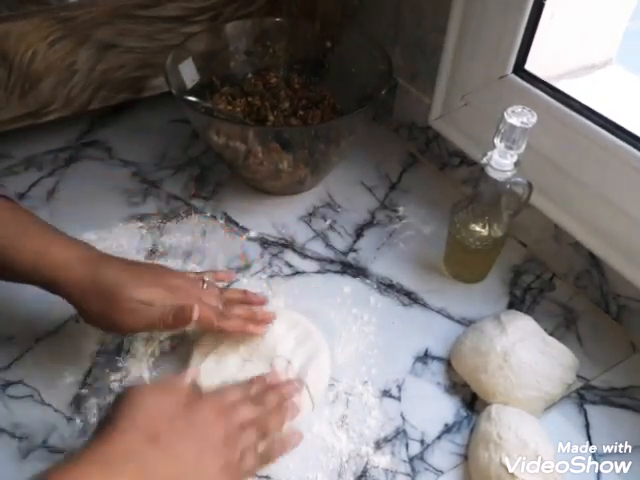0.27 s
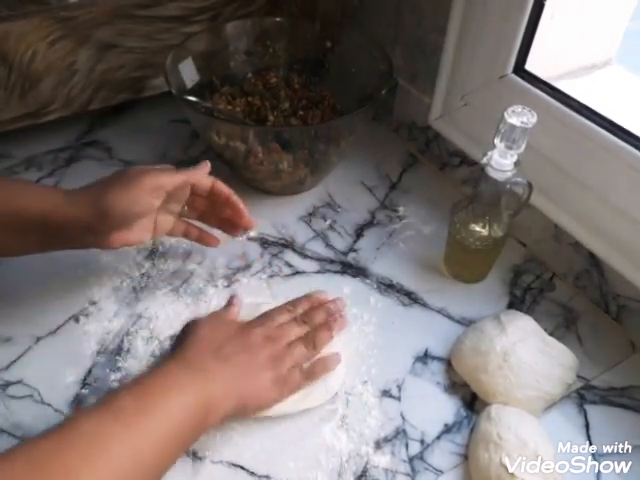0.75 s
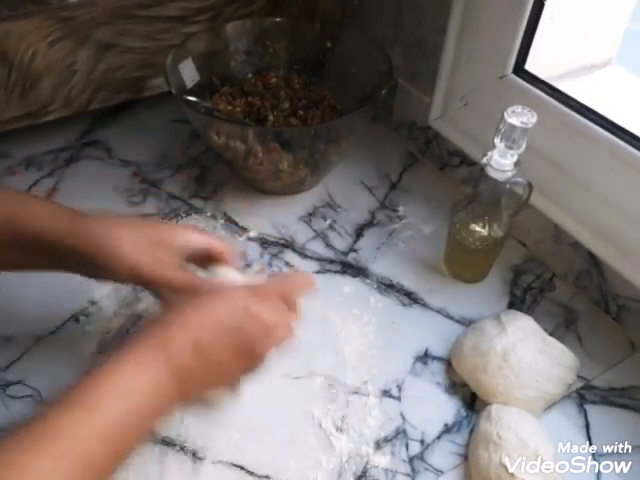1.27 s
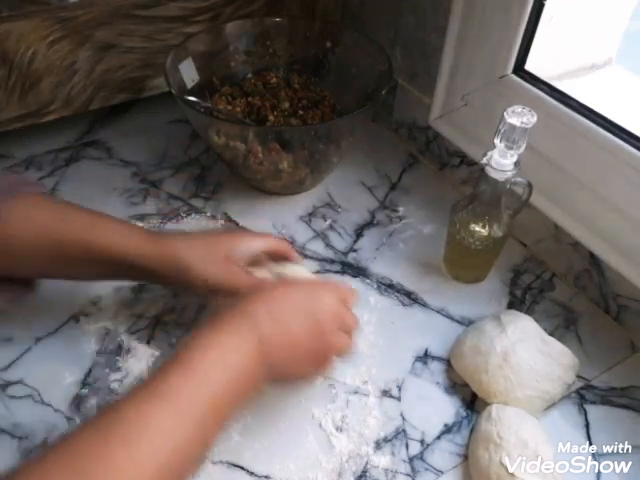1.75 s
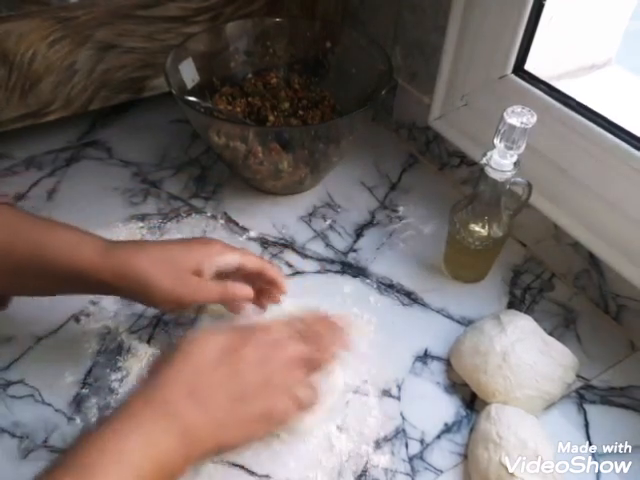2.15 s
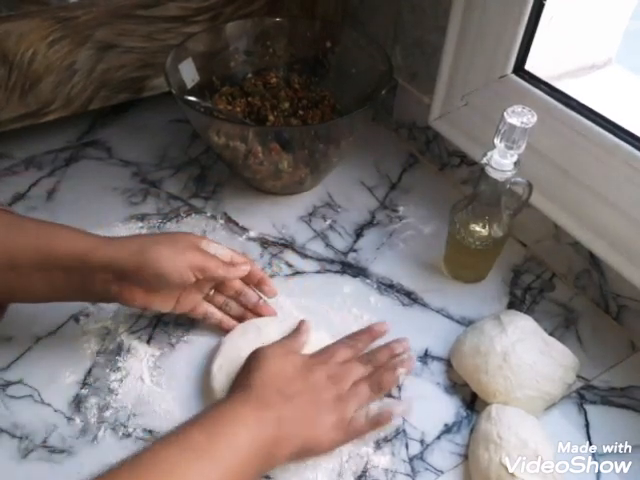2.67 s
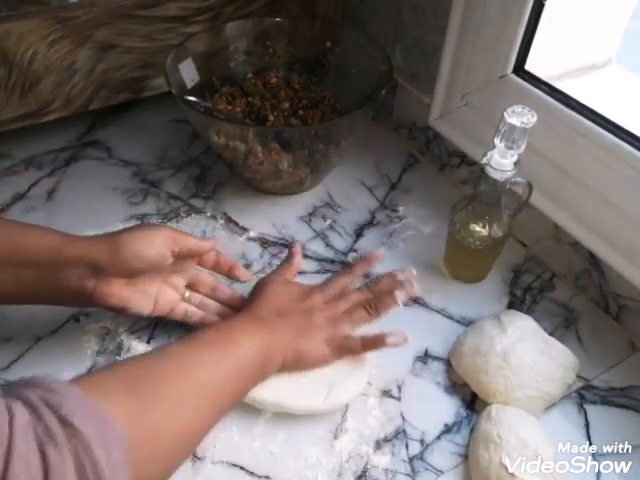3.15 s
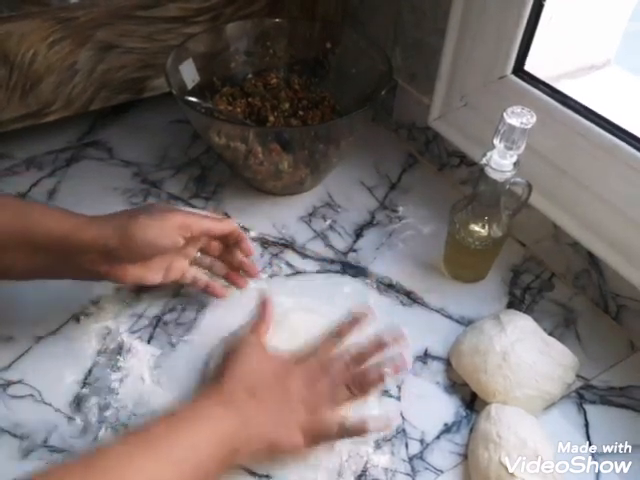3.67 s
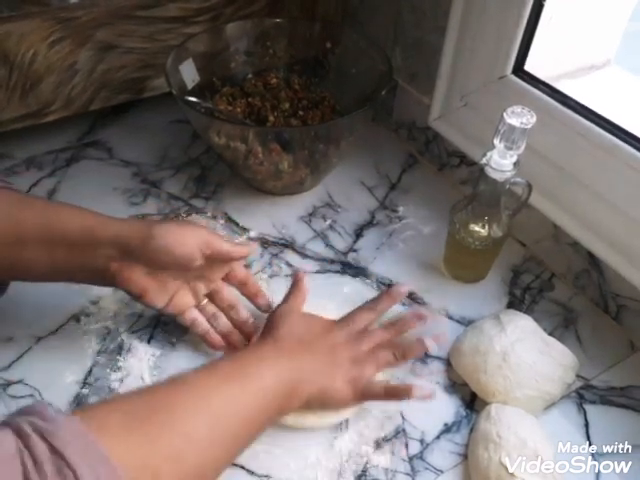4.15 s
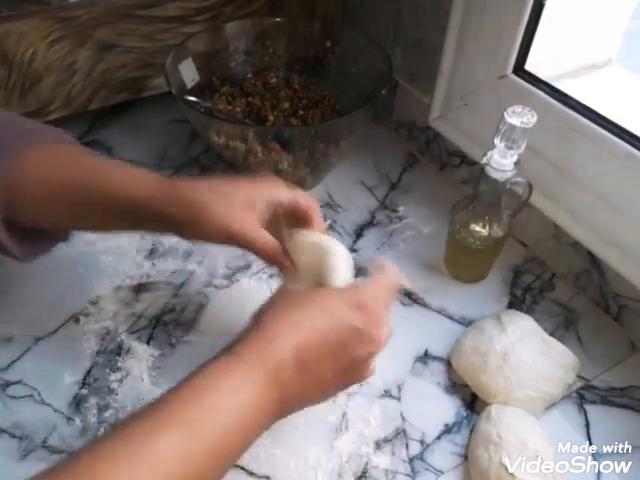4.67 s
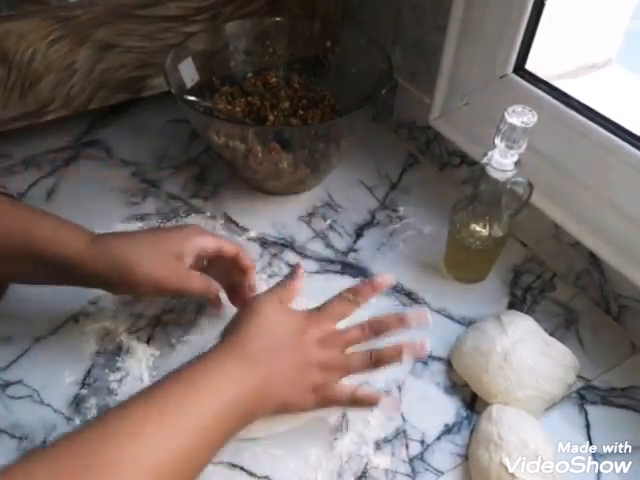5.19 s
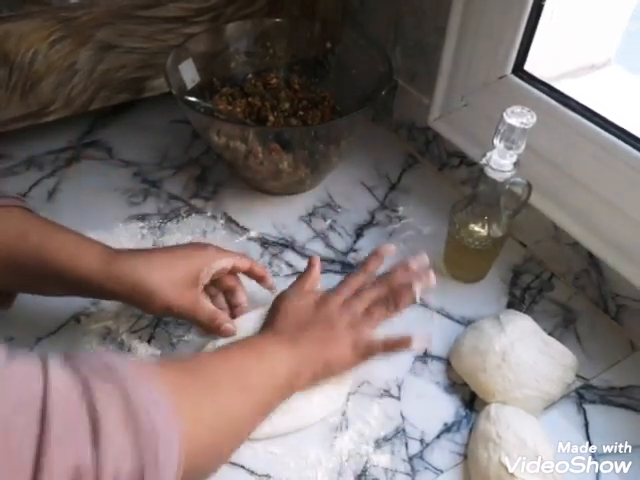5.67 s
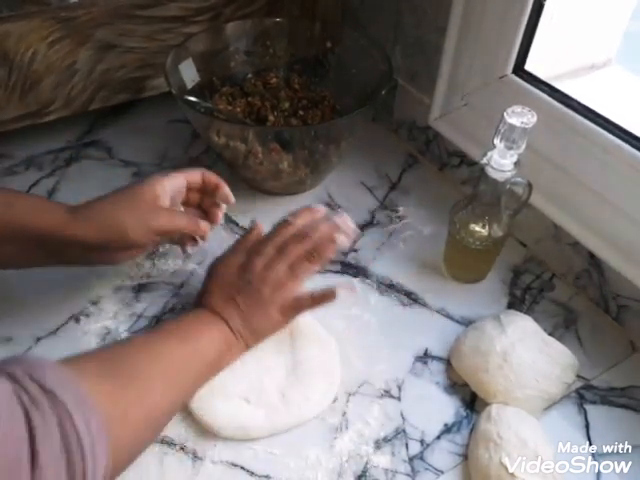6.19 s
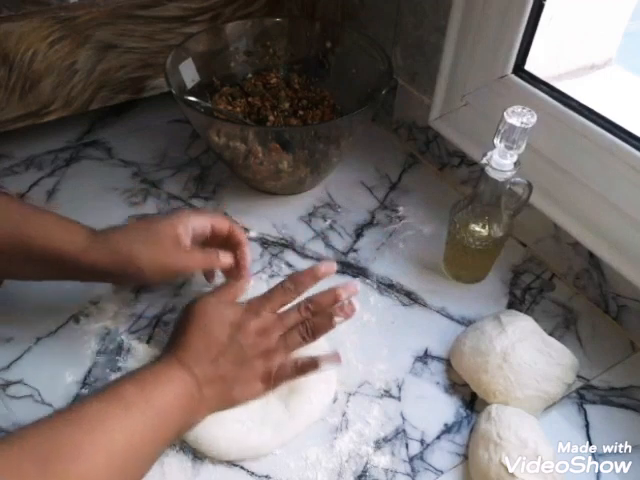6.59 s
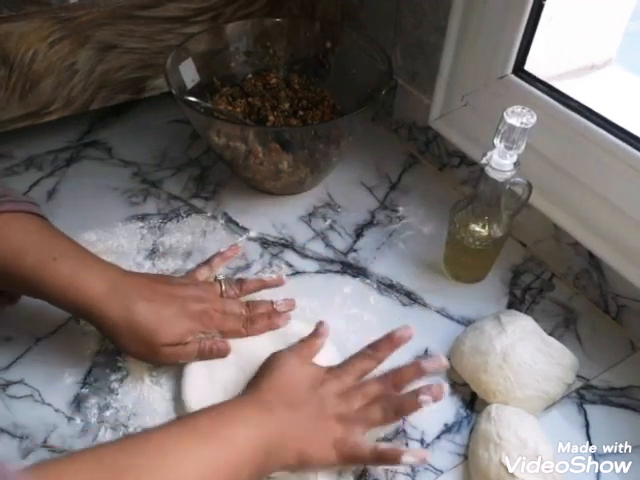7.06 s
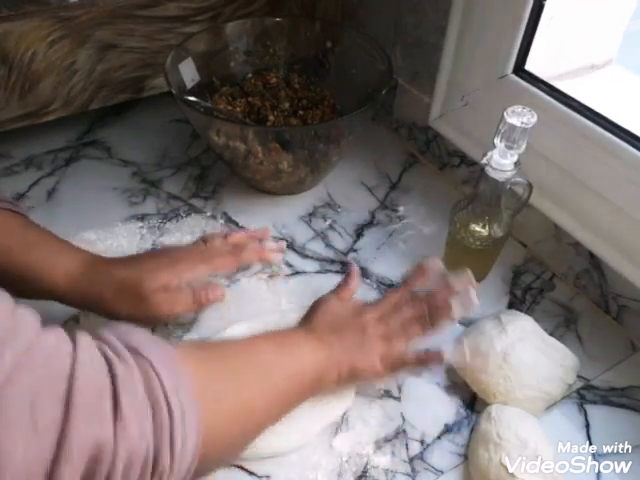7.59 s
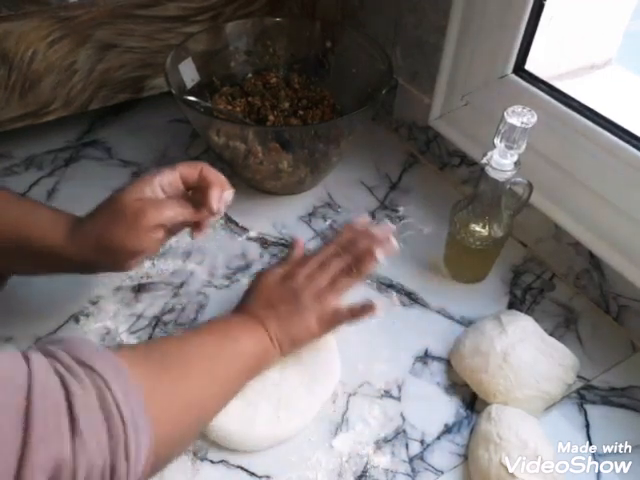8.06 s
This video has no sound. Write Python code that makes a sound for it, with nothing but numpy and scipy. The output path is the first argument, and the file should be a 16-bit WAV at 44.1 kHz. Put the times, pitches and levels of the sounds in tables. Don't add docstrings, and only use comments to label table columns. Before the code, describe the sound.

Close in a hard, echoing kitchen, bare hands work soft dough on a floured stone counter. Early pats build to a firm slap, then dry skin rubs through flour as the dough is turned. More pats follow, with two loud smacks standing well above the rest, and the end fades into faint touches and light brushing over a low room rumble.

```python
import sys
import numpy as np
from scipy import signal
from scipy.fft import rfft, irfft
from scipy.io import wavfile
from scipy.ndimage import uniform_filter1d

SR = 44100
rng = np.random.default_rng(int(sys.argv[2]) if len(sys.argv) > 2 else 0)


def dump(signal):
    limited = np.clip(np.atleast_2d(signal).T, -1, 1)
    pcm = np.round(limited * 32767).astype(np.int16)
    wavfile.write(sys.argv[1], SR, pcm)


def level_to_linear(level):
    exponent = np.asarray(level, float) / 20
    return 10 ** exponent


N = 367353

# [dB, flour puff against palm]
SLAPS = [(0.072, -39, 805, 1.3, -14), (0.46, -40.5, 382, 2.1, -11), (0.647, -30.5, 620, 0.96, -15),
         (0.845, -19.5, 1200, 4.5, -16), (2.15, -52.5, 382, 0.79, -8.5), (2.297, -32, 670, 0.74, -29),
         (2.536, -26, 714, 2.1, -36), (2.75, -22, 930, 1.7, -32), (2.96, -29, 643, 1.17, -19),
         (3.168, -41, 398, 1.9, -14.5), (3.384, -30, 537, 0.4, -16.5), (3.498, -50, 505, 0.14, -13),
         (3.585, -6.5, 524, 0.33, -14.5), (3.979, -19, 536, 0.85, -20.5), (4.201, -38, 636, 0.2, -9.5),
         (4.999, -22, 600, 1.5, -31.5), (5.309, -24.5, 776, 0.32, -18.5), (5.62, -29.5, 456, 0.94, -24.5),
         (5.8983, -7.5, 676, 0.69, -17.5), (6.396, -42, 710, 0.41, -9.5), (6.866, -47.5, 809, 0.79, 1),
         (7.075, -50.5, 496, 1.4, -6), (7.301, -47.5, 908, 0.48, -12), (8.008, -49, 772, 0.47, -23)]


def at_hz(points, hz):
    points = np.array(points)
    return np.interp(np.log(hz), np.log(points[:, 0]), points[:, 1])


def rms_one(x):
    return x / np.sqrt(np.mean(x ** 2) + 1e-20)


def drift(rate_hz):
    steps = rng.standard_normal(int(N / SR * rate_hz) + 3)
    return np.interp(np.arange(N) / SR * rate_hz, np.arange(len(steps)), steps)


def bands(count, low_hz):
    white = rng.standard_normal((2, count))
    edges = low_hz * 2 ** np.arange(0, 12, 0.5)
    edges = edges[edges < 0.45 * SR]
    for k, (low, high) in enumerate(zip(edges, edges[1:])):
        band = signal.butter(2, [low, high], "band", fs=SR, output="sos")
        yield np.sqrt(low * high), signal.sosfilt(band, white[k % 2])


def resonance(x, hz, width_hz):
    r = np.exp(-np.pi * width_hz / SR)
    y = signal.lfilter([1, 0, -1], [1, -2 * r * np.cos(2 * np.pi * hz / SR), r * r], x)
    return y / np.abs(y).max()


def add(out, s, x):
    i = round(s * SR)
    out[i:i + len(x)] += x[:N - i]


def rumble():
    # band_hz [Hz], level_db [dB per Hz]
    house = [(15, -43), (25, 3), (120, 6.5), (157, -1), (242, -11.5), (560, -6.5), (1160, -19.5),
             (1370, -11.5), (3160, -31), (4870, -23.5), (12500, -24.5), (14400, -28.5), (16000, -55.5)]
    noise_sum = 0
    for hz, noise in bands(N, low_hz=24.9):
        noise_sum = noise_sum + noise * level_to_linear(at_hz(house, hz) + 2.5 * drift(5))
    return level_to_linear(-68) * rms_one(noise_sum)


def swells(rows, fade_db):
    t = np.arange(0, N, 32)[:, None] / SR
    s, db, rise_s, fall_s = np.transpose(rows)
    away = np.maximum((s - t) / np.maximum(rise_s, 0.005), (t - s) / np.maximum(fall_s, 0.005))
    power = (level_to_linear(db - fade_db * away) ** 2).sum(axis=1)
    return np.interp(np.arange(N) / SR, t[:, 0], power)


def rub():
    # fastest_s [s], hiss_db [dB], speeding_up_s [s], slowing_down_s [s]
    strokes = [(.05, -51.5, 0.17, 0.16), (.28, -58.5, 0.1, 0.091), (.79, -58.5, 0.6, 0.39),
               (1.15, -50, 0.039, 0.24), (1.33, -50.5, 0.085, 0.067), (1.53, -69, 0.0092, 0.6),
               (1.7, -44, 0.055, 0.35), (1.83, -38.5, 0.43, 0.21), (1.99, -48, 0.23, 0.054),
               (3.125, -43, .05, 0.044), (3.2, -59, .4, 0.54), (3.325, -53.5, .08, .04),
               (4.22, -47, 0.12, 0.014), (4.71, -49, 0.32, 0.15), (5.8, -41.5, 0.075, 0.032),
               (5.97, -55, 0.031, 0.49), (6.17, -49, 0.071, 0.11), (6.295, -42, 0.026, 0.045),
               (6.4, -44, .03, 0.058), (6.63, -48, 0.027, 0.057), (6.87, -48, .06, .11),
               (7.1, -57.5, 0.48, .11), (7.24, -47.5, 0.18, 0.027), (7.38, -61, .2, 0.18),
               (7.47, -44.5, 0.17, 0.022), (7.7, -48.5, .06, 0.14), (7.66, -55, 0.42, 0.097),
               (7.8, -58, .1, 1.3), (8.195, -46.5, 0.029, .12)]
    brushes = [(1.23, -50.5, .06, 0.17), (1.455, -62, 0.018, 0.0073), (2.09, -60, 0.027, 0.071),
               (2.556, -36.5, 0.011, 0.019), (2.46, -56, 0.036, .03), (2.68, -58, 0.026, .03),
               (3.79, -52.5, 0.052, 0.1), (4.335, -56.5, 0.03, 0.058), (4.6, -55.5, .08, 0.053),
               (6.06, -51, 0.059, 0.046), (6.535, -52.5, .04, 0.056), (6.78, -56.5, 0.051, 0.056),
               (7.02, -53, 0.058, .05), (8.27, -51, 0.039, .06)]
    # band_hz [Hz], level_db [dB per Hz]
    flour = [(290, -78), (500, -43.5), (773, -11), (1670, -3.5), (2160, -6), (4280, -4), (5800, 0.5),
             (10400, -6.5), (13300, -3), (16000, -8)]
    fade_db, resting_db = 28, -70
    stroke_dullness, spray_dullness, brush_dullness = 0.27, 4, -4.5

    spray_rise_s, spray_fall_s = 0.004, fade_db / 109
    sprays = []
    for s, db, *_ in SLAPS:
        spray_db = -53 + 0.42 * (db + 31)
        sprays.append((s + spray_rise_s, spray_db, spray_rise_s, spray_fall_s))

    sliding = swells(strokes, fade_db) + level_to_linear(resting_db) ** 2
    spray = swells(sprays, fade_db)
    brush = swells(brushes, fade_db)
    power = sliding + spray + brush
    dullness = (stroke_dullness * sliding + spray_dullness * spray + brush_dullness * brush) / power

    grit = level_to_linear(1.6 * drift(70) + 1.3 * drift(400))
    hiss = 0
    for hz, noise in bands(N, low_hz=582.0):
        tilt_db = np.clip(dullness, -8, 6) * np.log2(8000 / hz)
        hiss = hiss + noise * level_to_linear(at_hz(flour, hz) + tilt_db + 2 * drift(25))
    return np.sqrt(power) * grit * hiss


def escaping_air(closing_ms, noise):
    t = np.arange(len(noise)) / SR / (closing_ms / 1000)
    swell = t ** 2 * np.exp(-t)
    burst = noise * swell
    for _ in range(3):
        spectrum = rfft(burst)
        burst = irfft(spectrum / (np.abs(spectrum) + 1e-12)) * np.minimum(3 * swell, 1)
    return np.pad(burst, (0, 1500))


def slaps():
    # level_db [dB peak], pocket_hz [Hz], relative_width [1]
    fingers = [(-45, 3900, 0.23), (-44, 2050, 1.14), (-26, 2670, 0.77), (-27, 2340, 0.15), (-54, 4540, 0.6),
               (-24, 5120, 0.75), (-28.5, 5000, 0.92), (-16, 2760, 1.0), (-30.5, 3150, 0.6),
               (-32.5, 1700, 0.91), (-43.5, 5400, 0.12), (-63, 3940, 0.3), (-7.5, 2420, 1.4),
               (-28.5, 3400, 1), (-48.5, 2535, 0.36), (-20.5, 1390, 1.7), (-20.5, 2190, 0.42),
               (-37, 2200, 0.19), (-24, 3200, 1.1), (-45.5, 4600, 0.44), (-61, 3770, 1.6), (-49, 3920, 0.3),
               (-43, 2700, 1.2), (-61.5, 5664, 0.3)]
    # start_s [s], level_db [dB peak], pocket_hz [Hz], relative_width [1]
    fingertips = [(.259, -46.5, 2020, 1.15), (0.476, -34.5, 1730, 1.85), (.836, -32.5, 2600, 2.7),
                  (1.521, -57.5, 515, 1.4), (2.551, -52, 3470, 2.9), (3.375, -51, 700, 2.1),
                  (4.989, -41.5, 1275, 1.4), (5.631, -46, 700, 0.74), (7.225, -42.5, 4610, 0.61),
                  (7.455, -51, 4590, .8), (7.519, -49, 2404, 1.5), (7.654, -59, 3535, 1.3),
                  (7.754, -52.5, 1577, .57), (7.935, -52.5, 4200, 1), (8.19, -47, 3060, 4.4),
                  (7.96, -58.5, 3830, 0.43), (8.212, -44, 5020, 0.8)]
    out = np.zeros(N)
    noise = rng.standard_normal((len(SLAPS), 1024))
    palm_top = signal.butter(1, 3500, fs=SR, output="sos")
    puff_band = signal.butter(2, [4200, 11000], "band", fs=SR, output="sos")

    for slap, landing, rough in zip(SLAPS, fingers, noise):
        s, db, hz, width, puff_db = slap
        finger_db, finger_hz, finger_width = landing
        closing_ms = 0.7414 - 0.09 * db
        air = escaping_air(np.clip(closing_ms, 0.4, 3.5) * 0.83, rough)
        lead_s = 0.0006 * closing_ms

        palm = signal.sosfilt(palm_top, resonance(air, hz, np.clip(width, 0.1, 1.5) * hz))
        puff = signal.sosfilt(puff_band, air)
        puff = level_to_linear(puff_db + 3) * puff / np.abs(puff).max()
        width_hz = np.clip(finger_width, 0.15, 2) * finger_hz
        finger = -resonance(resonance(air, finger_hz, width_hz), finger_hz, width_hz)
        add(out, s - lead_s, level_to_linear(db - 0.87) * (palm + puff) + level_to_linear(finger_db - 4.0) * finger)

    for (s, db, hz, width), rough in zip(fingertips, noise[:, ::-1]):
        width_hz = np.clip(width, 0.2, 2) * hz
        air = escaping_air(1.5, rough)
        add(out, s - 0.005, level_to_linear(db) * resonance(resonance(air, hz, width_hz), hz, width_hz))
    return out


def thuds():
    # start_s [s], level_db [dB peak], thud_hz [Hz]
    landings = [(0.075, -55.5, 144), (0.25, -56, 133), (0.472, -41, 146), (0.641, -35, 141),
                (0.841, -43, 142), (1.13, -48.5, 173), (2.147, -55.5, 130), (2.292, -44, 96),
                (2.544, -43, 159), (2.75, -45, 156), (2.96, -42, 120), (3.064, -57.5, 124),
                (3.167, -54.5, 133), (3.388, -45, 151.6), (3.588, -30, 152), (3.814, -43, 174),
                (3.974, -37, 180), (4.202, -50, 165), (4.997, -45, 96.5), (5.306, -40.5, 138),
                (5.622, -39, 129), (5.897, -33, 179), (6.261, -67, 162), (7.295, -64, 135)]
    out, t = np.zeros(N), np.arange(6000) / SR
    push = t * np.exp(-t / 0.0014)
    for s, db, hz in landings:
        add(out, s, level_to_linear(db + 0.5) * resonance(resonance(push, hz, 70), hz, 110))
    return out


def kitchen(x, tail_db):
    # band_hz [Hz], t60_s [s]
    decay = [(80, 2.3), (210, 0.7), (560, 1.36), (1470, 1.17), (3880, 1.32), (10200, 0.062)]
    # band_hz [Hz], level_db [dB]
    colour = [(80, -9), (170, 4), (260, 3.5), (560, -3.5), (1500, -5), (4000, -4.5), (10000, -1.5)]
    # delay_s [s], level_db [dB]
    echoes = [
        (.0042, -15),
        (0.014, -16),
        (0.024, -17.5),
        (.034, -22),
        (0.06, -29.5),
    ]
    t = np.arange(2 * SR) / SR
    tail = 0
    for hz, noise in bands(len(t), low_hz=50):
        tail = tail + noise * level_to_linear(at_hz(colour, hz) - 60 * t / at_hz(decay, hz))
    answer = level_to_linear(tail_db) * tail * (1 - np.exp(-t / 0.0027))
    answer[0] = 1
    for s, db in echoes:
        answer[round(s * SR)] += level_to_linear(db)
    return signal.fftconvolve(x, answer)[:N]


def grainy_sides(mono):
    # band_hz [Hz], level_db [dB per Hz]
    grain_colour = [(24, -33), (40, -2.5), (140, -1.5), (354, -2), (810, -2.5), (2980, -2.5), (4460, 0.5),
                    (14500, -3.5), (16000, -13.5)]
    hz, _, cells = signal.stft(mono, SR, nperseg=1024)
    level = np.abs(uniform_filter1d(np.abs(cells) ** 2, size=12, axis=0)) + 1e-30
    total = level.sum(axis=0)

    floor_db = -59.0 + 16 * np.log2((hz[:, None] + 1) / 10000)
    audible = level / (total * level_to_linear(2 * floor_db))
    mid = signal.istft(cells * audible ** 2 / (1 + audible ** 2), SR)[1][:N]

    noise = rng.standard_normal(cells.shape) + 1j * rng.standard_normal(cells.shape)
    grain = level_to_linear(at_hz(grain_colour, hz + 1) - 100.5)[:, None] * (total * 1e6) ** 0.12
    smooth = uniform_filter1d(uniform_filter1d(noise.real, size=16, axis=0), size=3, axis=1)
    patches = level_to_linear(7 * rms_one(smooth))
    masked = np.sqrt(level) * patches / (grain * level_to_linear(41.5))
    sudden = total > level_to_linear(2 * 9) * np.roll(total, 2)
    attack = level_to_linear(-34.5) * sudden * np.abs(cells) * noise
    side = signal.istft(grain * noise / (1 + masked ** 4) + attack, SR)[1][:N]
    return np.array([mid + side, mid - side])


def scene():
    hits, hiss = slaps() + thuds(), rub()
    room = kitchen(hits + level_to_linear(-7.5) * hiss, tail_db=-37)
    mono = room + level_to_linear(-14.5) * hiss + rumble()
    return np.array([mono, mono])


def band_limit(x):
    return signal.sosfilt(signal.butter(12, 16460, fs=SR, output="sos"), x)


def record(dry):
    low_cut = signal.butter(2, 74, "high", fs=SR, output="sos")
    top_cut = signal.cheby2(10, 50, 15800 + 600, fs=SR, output="sos")
    mono = signal.sosfilt(np.vstack([low_cut, top_cut]), dry[0])
    return band_limit(grainy_sides(mono))


dry = scene()
out = record(dry)
dump(out)
```